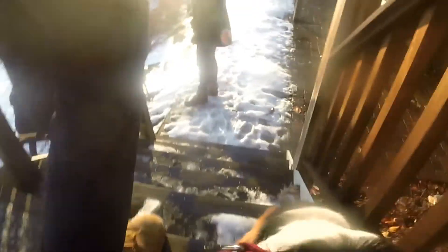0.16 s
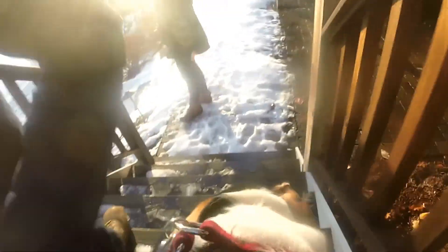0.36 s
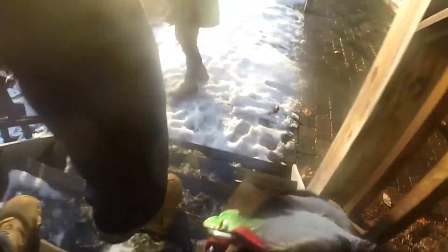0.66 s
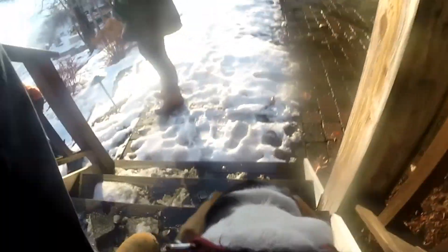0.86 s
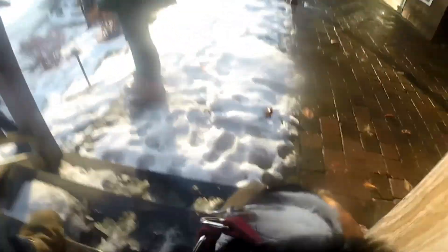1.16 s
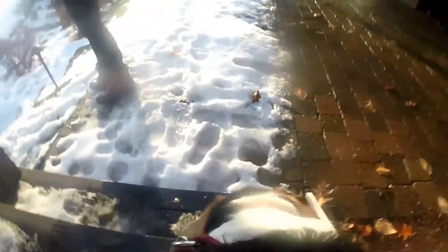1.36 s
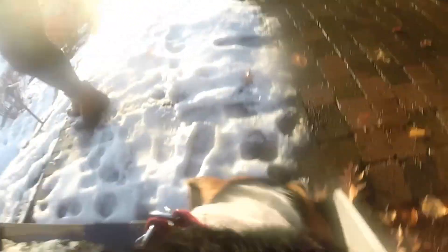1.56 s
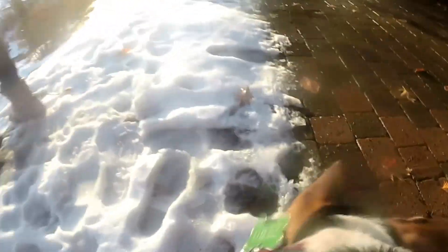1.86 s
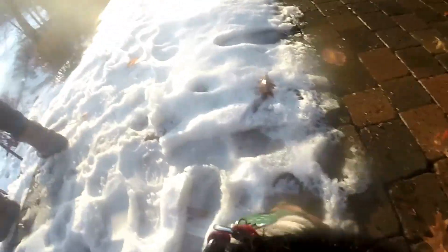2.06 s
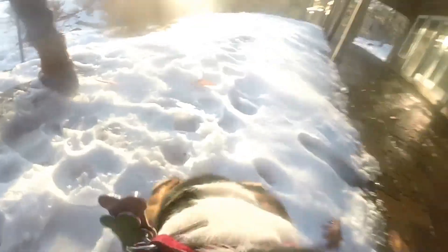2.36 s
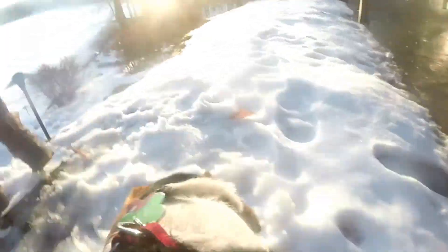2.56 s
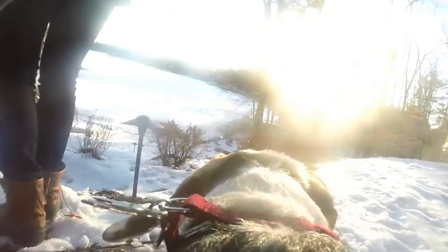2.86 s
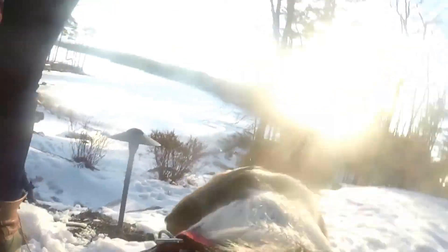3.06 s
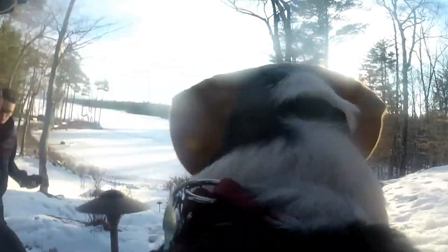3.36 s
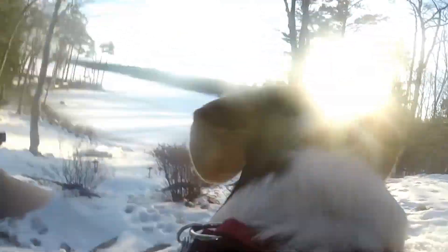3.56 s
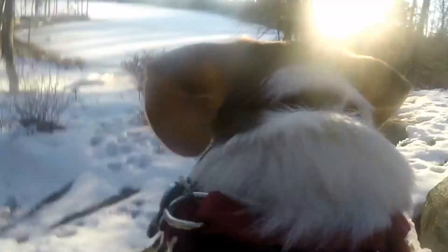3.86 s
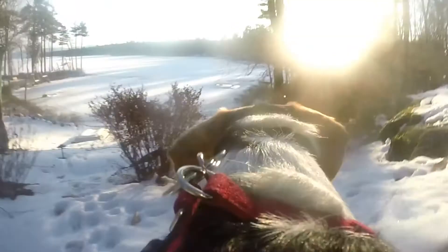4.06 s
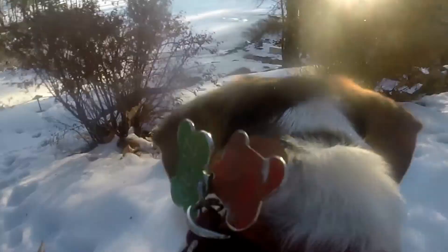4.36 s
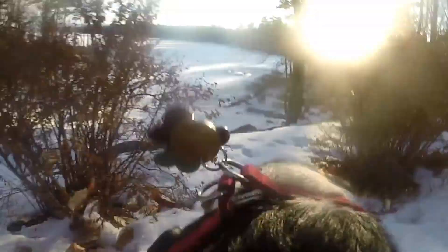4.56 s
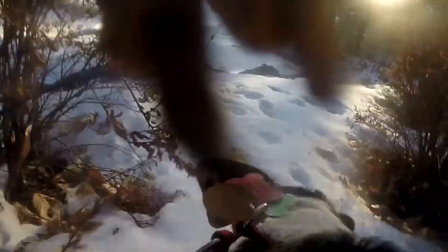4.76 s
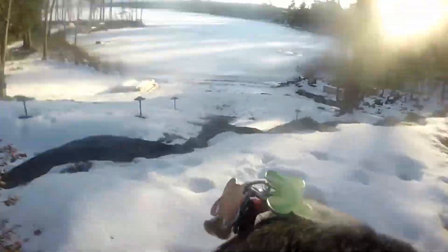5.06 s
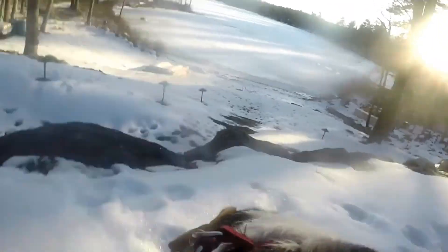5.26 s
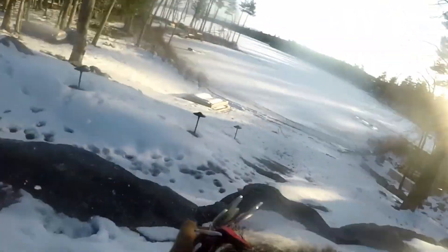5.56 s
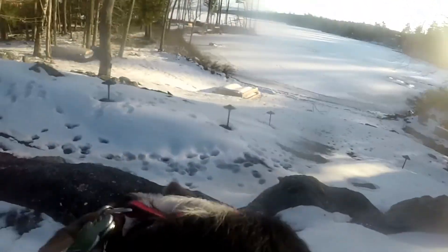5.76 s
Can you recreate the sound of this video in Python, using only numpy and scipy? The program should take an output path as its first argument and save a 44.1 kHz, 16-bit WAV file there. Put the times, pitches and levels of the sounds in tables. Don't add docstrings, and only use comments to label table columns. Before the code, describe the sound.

Very close, dry harness noise from a dog trotting down steps and across snow. Low wobbling thumps follow its strides, with tiny metal clinks and soft fabric rubbing throughout. Light plastic ticks lead to a loud scraping knock around three seconds; jangling grows strongest between 4.2 and 4.8, then a gritty, bright scrape cracks before the sound thins to light clinks.

```python
import sys
import numpy as np
from scipy import signal
from scipy.fft import rfft, irfft
from scipy.io import wavfile

SR = 44100
rng = np.random.default_rng(int(sys.argv[2]) if len(sys.argv) > 2 else 0)


def natural_amplitude(level_db):
    exponent = np.asarray(level_db, float) / 20
    return 10 ** exponent


def master(y):
    cut = np.clip(np.atleast_2d(y).T, -1, 1)
    pcm = np.round(cut * 32767)
    wavfile.write(sys.argv[1], SR, pcm.astype(np.int16))


N = 260190


def rms_one(x):
    return x / np.sqrt(np.mean(x ** 2) + 1e-20)


def noise():
    return rng.standard_normal(N)


def coloured(x, spectrum):
    hz, db = np.transpose(spectrum)
    bins_hz = np.fft.rfftfreq(N, 1 / SR) + 1
    gain_db = np.interp(np.log(bins_hz), np.log(hz), db, -120, -120)
    return rms_one(irfft(rfft(x) * natural_amplitude(gain_db), N))


def band(x, low_hz, high_hz):
    limits_hz = [low_hz, min(high_hz, .45 * SR)]
    return signal.sosfilt(signal.butter(2, limits_hz, "band", fs=SR, output="sos"), x)


def drift(rate):
    knots = rng.standard_normal(600)
    return np.interp(np.arange(N) / SR * rate, np.arange(600), knots)


def ring(clicks, hz, t60):
    r, w = natural_amplitude(-60 / (t60 * SR)), 2 * np.pi * hz / SR
    return signal.lfilter([0, np.sin(w)], [1, -2 * r * np.cos(w), r * r], clicks + 1e-18)


def fade(clicks, t60):
    return signal.lfilter([1], [1, -natural_amplitude(-60 / (t60 * SR))], clicks)


def train(s, size):
    return np.bincount(np.clip((s * SR).astype(int), 0, N - 1), size, N)


def grains(per_s, spread_db):
    sizes = natural_amplitude(spread_db * np.minimum(rng.exponential(1, N), 4)) * rng.choice([-1, 1], N)
    return rms_one(sizes * (rng.random(N) < per_s / SR))


def sway():
    t, width_s = np.arange(N) / SR, 0.047
    return sum(natural_amplitude(-18 + 0.56 * peak_db) * np.exp(-((t - s) / width_s) ** 2) for s, peak_db, _, _ in JOLTS)


# time in seconds, rumble between jolts in dB, strap rustle in dB.
TROT = [(0.0, -28.5, -51.5), (1.0, -24.5, -50), (1.66, -35.5, -50.5), (1.81, -21.5, -45.5),
        (1.94, -29, -48), (2.05, -28, -51), (2.68, -26, -51.5), (3.2, -27, -49), (3.5, -22.5, -54),
        (3.83, -28.5, -49.5), (4.22, -19, -51), (4.67, -27, -47.5), (4.88, -27, -54), (5.08, -22.5, -59.5),
        (5.34, -18.5, -53), (5.9, -35.5, -54)]


def trot_levels():
    s, *columns = np.transpose(TROT)
    rumble_db, rustle_db = (np.interp(np.arange(N) / SR, s, c) for c in columns)
    rumble_db = 20 * np.log10(natural_amplitude(rumble_db) + sway())
    rustle_db = np.minimum(rustle_db + 0.14 * (rumble_db + 29.5), -42)
    return rumble_db, rustle_db


# frequency in Hz, strength in dB per Hz.
RUMBLE = [(8, -12.5), (17, 3.5), (30, 5.5), (41, 0.5), (89, -15), (129, -28.5), (160, -35), (260, -100)]


def rumble(rumble_db):
    return natural_amplitude(rumble_db + 0.5 + 4.8 * drift(12)) * coloured(noise(), RUMBLE)


# frequency in Hz, strength in dB per Hz.
THUD = [(47, -102), (80, -7.5), (219, -17.5), (622, -28.5), (709, -30), (883, -39.5), (1100, -36),
        (1430, -40), (2420, -120)]


def harness_thud():
    return coloured(noise(), THUD)


def harness_murmur(rumble_db):
    return natural_amplitude(0.42 * rumble_db - 35.5 + 3.8 * drift(25)) * harness_thud()


# frequency in Hz, strength in dB per Hz.
RUSTLE = [(410, -60), (700, -3), (930, -10), (1350, -6), (1700, 3), (2000, -4), (2600, -5), (4300, -17),
          (6150, -18), (7700, -28), (10000, -36), (15000, -50)]


def rustle(rustle_db):
    return natural_amplitude(rustle_db + 1.5 + 2.64 * drift(33)) * coloured(grains(6000, spread_db=0.5), RUSTLE)


# start in seconds, level in dB, small tags over big ring in dB, rattle length in seconds.
CLASHES = [(0.48, -41, 2.5, 0.06), (0.534, -39, 6, 0.037), (0.561, -37.5, -5.5, 0.0084),
           (1.068, -42.5, 0, 0.024), (1.1103, -38.5, -2.5, .011), (1.6451, -37.5, 3, 0.03),
           (1.9908, -36, -13, 0.014), (2.0082, -38.5, -1.5, 0.024), (2.373, -39, -3, 0.1),
           (2.4366, -32.5, -4, 0.0053), (2.4912, -36, 2, 0.0075), (2.5407, -37.5, -6.5, .016),
           (3.0763, -40.5, -6, 0.013), (3.102, -44.5, -1, .02), (3.3144, -41.5, -7, .015),
           (3.3446, -36.5, 6, 0.0085), (3.473, -33.5, 2, 0.037), (3.9625, -41, 4, 0.012),
           (3.9777, -35.5, 15, 0.013), (4.1994, -37, 7, .017), (4.2779, -33, -3, 0.021),
           (4.298, -22.5, -1, 0.041), (4.5115, -26.5, -10, .014), (4.6599, -30, 7, 0.0097),
           (4.68, -27.5, 2, 0.033), (4.7092, -33, 1, 0.028), (4.7922, -19.5, 13, 0.02),
           (5.071, -40.5, -2.5, .028), (5.2673, -40.5, 2, 0.027), (5.3466, -31, -2.5, 0.029)]
# start in seconds, level in dB.
TAG_TOUCHES = [(0.2396, -43), (0.2922, -54), (0.416, -40), (0.856, -43), (0.996, -53), (1.164, -53),
               (1.4046, -48), (1.5789, -51.5), (1.7259, -50), (1.9151, -44.5), (2.2345, -42),
               (2.6426, -43.5), (3.0596, -43), (3.2883, -37.5), (3.6149, -42.5), (3.867, -43),
               (4.0087, -43), (4.0515, -48), (4.3692, -42), (4.5296, -48), (4.974, -36), (5.555, -47.5),
               (5.599, -38.5), (5.7666, -49.5)]
# start in seconds, level in dB.
RING_TOUCHES = [(0.6408, -49.5), (0.9083, -55.5), (1.2108, -46), (1.2715, -52), (1.3666, -47),
                (1.6773, -41), (1.9643, -46), (2.1591, -47.5), (2.2827, -56), (3.397, -51), (3.848, -47.5),
                (4.4281, -49), (4.4863, -42), (5.017, -38.5), (5.112, -48), (5.1354, -46.5), (5.194, -48),
                (5.331, -42), (5.4575, -57), (5.4879, -50.5), (5.7299, -53), (5.861, -46)]


def strikes():
    touch_s, bounce_within_s, bounce_loss_db = 0.02, .1, 13.0
    hits = list(CLASHES)
    for rows, tilt_db in ((TAG_TOUCHES, 2.5), (RING_TOUCHES, -8)):
        hits += [(s, db, tilt_db, touch_s) for s, db in rows]
    bounces = []
    for (s, db, tilt_db, length), pair in zip(hits, rng.random((len(hits), 2, 3))):
        for wait, weak, turn in pair:
            bounce_db = min(db, -36) - bounce_loss_db * (.5 + weak)
            bounces.append((s + length + bounce_within_s * wait, bounce_db, tilt_db + 16 * (turn - .5), .005))
    return np.transpose(hits + bounces)


# frequency in Hz, level in dB, seconds to fall 60 dB.
BIG_RING = [(3500, -23, .07), (4040, -12, .04), (4640, -8, .025), (4770, -6, .042), (6030, -3, .04),
            (6180, -5, .02), (6700, -9, .018)]
# frequency in Hz, level in dB, seconds to fall 60 dB.
NAME_TAG = [(7300, -13, .018), (8220, -5, .03), (9360, -4, .03), (9680, -5, .03), (10780, -4, .045)]
# frequency in Hz, level in dB, seconds to fall 60 dB.
SMALL_LINK = [(12700, -7, .03), (13540, -8, .03), (14420, -12, .025), (14920, -14, .025)]


def tags():
    s, level_db, tilt_db, length = strikes()
    place = np.sort(rng.random((len(s), 14)), axis=1)
    place -= place[:, :1]
    times = (s[:, None] + place * .8 * np.clip(length, .002, .08)[:, None]).ravel()
    force_db = level_db[:, None] - 2 - 9 * np.abs(place - .2) + 4 * rng.normal(0, 1, place.shape)
    tag_db = -10 * np.log10(2.0 + 10 ** (-tilt_db / 10))
    ring_db = tag_db - tilt_db
    out = np.zeros(N)
    for part, rel_db, gain_db in ((BIG_RING, ring_db, -1.5), (NAME_TAG, tag_db, -2.5), (SMALL_LINK, tag_db, -2.4)):
        swing = fade(train(s, natural_amplitude(0.73 * level_db + rel_db - 11.5)), t60=.2) + natural_amplitude(-62)
        for hz, db, t60 in part:
            share_db = 3 - 16 * rng.random((len(s), 1)) ** 2 + 1 + 4 * rng.normal(0, 1, place.shape)
            size = natural_amplitude(force_db + rel_db[:, None] + share_db + gain_db) * rng.choice([-1, 1], place.shape)
            shiver = swing * natural_amplitude(-41 + 8 * drift(30)) * grains(1800, spread_db=3)
            note = ring(train(times, size.ravel()) + shiver, hz, t60)
            out += natural_amplitude(db) * band(note, .85 * hz, 1.15 * hz)
    return out + contact_crackle(times, force_db, ring_db, tag_db)


def contact_crackle(times, force_db, ring_db, tag_db):
    overtones_hz = 3500 * 4.2 ** ((np.arange(15) + rng.random(15)) / 15)
    crackle = sum(natural_amplitude(6 * drift(45)) * ring(grains(1500, spread_db=4.0), hz, .01) for hz in overtones_hz)
    out = np.zeros(N)
    for rel_db, low_hz, high_hz in ((ring_db, 3600, 7300), (tag_db, 7300, 15000)):
        contact_db = (force_db + rel_db[:, None]).ravel()
        puff = fade(train(times, natural_amplitude(contact_db - 30.5)), t60=0.0055)
        chatter = fade(train(times, natural_amplitude(contact_db - 22)), t60=.1) * natural_amplitude(2.9 * drift(60))
        out += (puff + chatter) * rms_one(band(crackle, low_hz, high_hz))
    return out


# time in seconds, peak in dB, direction (1 or -1), swing frequency in Hz.
JOLTS = [(0.248, -10, 1, 32), (0.559, -18, 1, 29.8), (0.811, -7.5, -1, 28.8), (1.099, -8, 1, 26.7),
         (1.31, -11.5, 1, 21.8), (1.378, -4.5, -1, 29.2), (1.587, -13.5, -1, 60), (1.702, -12, -1, 24.2),
         (1.935, -13, 1, 28.4), (1.988, -14, 1, 51.3), (2.335, -9.5, -1, 26.3), (2.402, -9.5, -1, 34.5),
         (2.692, -22, 1, 34.8), (2.8, -18.5, 1, 38), (2.927, -4.5, 1, 55.7), (3.414, -1.5, -1, 26),
         (3.59, -13.5, -1, 28), (3.809, -17.5, 1, 37.3), (4, -5, -1, 28), (4.045, -8.5, -1, 25),
         (4.17, -17, 1, 28), (4.204, -7, -1, 37), (4.258, -6.5, 1, 28.2), (4.478, -2, 1, 51.6),
         (4.524, -12, 1, 29.2), (4.666, -5.5, -1, 57.4), (4.78, 3, 1, 41.2), (4.833, -10.5, 1, 42.6),
         (5.288, -7.5, -1, 45.7), (5.503, -9.5, 1, 31)]


def jolts():
    out, shake, t = np.zeros(N), np.zeros(N), np.arange(-3000, 3000) / SR
    for s, peak_db, direction, hz in JOLTS:
        at = slice(int(s * SR) - 3000, int(s * SR) + 3000)
        swing = np.cos(2 * np.pi * hz * t) * np.exp(-(2.48 * hz * t) ** 2)
        out[at] += natural_amplitude(peak_db + 1.5) * np.sign(direction) * swing
        thud_db = -41 + 0.78 * peak_db + 0.18 * hz + 8.0
        shake[at] += natural_amplitude(thud_db) * np.exp(-(t / 0.016) ** 2)
    return out + shake * harness_thud()


# start in seconds, peak in dB.
THUMPS = [
    (0.434, -15),
    (1.577, -17.5),
]


def thumps():
    out, t = np.zeros(N), np.arange(int(.07 * SR)) / SR
    cycles = 95 * t + 220 * 0.0086 * (1 - np.exp(-t / 0.0067))
    tone = np.sin(2 * np.pi * cycles) * (1 - np.exp(-t / 0.017)) * np.exp(-t / 0.013)
    for s, peak_db in THUMPS:
        out[int(s * SR):int(s * SR) + len(t)] += natural_amplitude(peak_db + 7) * tone
    return out


# frequency in Hz, level in dB, seconds to fall 60 dB.
HOUSING = [(1240, -3.5, 0.0083), (1623, 0, 0.019), (2274, 4, 0.0088), (2560, 4.5, 0.0086),
           (2621, -4, 0.023), (3590, -22.5, 0.004)]


def housing(clicks):
    return sum(natural_amplitude(db) * ring(clicks, hz, t60) * (-1) ** k for k, (hz, db, t60) in enumerate(HOUSING))


# hardest rub in seconds, build-up in seconds, let-go in seconds, body in dB, hiss in dB.
SCRAPES = [(0.535, 0.042, 0.032, -40, -59), (1.281, 0.15, 0.093, -38, -49.5), (4.21, .08, 0.12, -43.5, -42),
           (1.088, 0.044, 0.033, -33, -39.5), (1.663, 0.05, 0.033, -28.5, -41),
           (2.908, 0.021, 0.022, -15.5, -28), (2.926, 0.01, 0.033, -7.5, -17.5),
           (2.967, 0.01, 0.055, -29, -30), (2.987, 0.021, 0.011, -14, -26.5),
           (4.904, 0.018, 0.016, -23.5, -35), (4.924, 0.0037, 0.031, -15, -10),
           (4.95, 0.02, 0.0076, -18, -11), (5.035, 0.0081, 0.064, -31.5, -44)]
# frequency in Hz, strength in dB per Hz.
HISS = [(1760, 16), (3000, -14.5), (3950, -17), (5920, -3.5), (8180, -6.5), (9260, -7.5), (12600, -18.5),
        (15500, -17)]


def scrapes():
    slips = grains(2000, spread_db=4.5)
    shell, upper = rms_one(housing(slips)), rms_one(band(slips, 2110, 3300))
    hiss = coloured(grains(12000, spread_db=4.0), HISS)
    thud = rms_one(band(noise(), 60, 190) + natural_amplitude(-10.5) * band(noise(), 280, 1100))
    out, t = np.zeros(N), np.arange(N) / SR
    for s, rise, fall, body_db, hiss_db in SCRAPES:
        away = np.maximum((s - t) / rise, (t - s) / fall)
        rub = natural_amplitude(-20 * np.minimum(away, 10))
        grit_db = hiss_db - body_db
        body = natural_amplitude(-2 - 0.37 * max(grit_db + 10.5, 0)) * shell + natural_amplitude(-4.5) * upper
        thud_db = body_db - 19 - grit_db
        out += rub * (natural_amplitude(body_db) * body + natural_amplitude(hiss_db) * hiss + natural_amplitude(thud_db) * thud)
    return out


# start in seconds, peak in dB, treble against the peak in dB.
TICKS = [(0.64, -24, 1), (0.7243, -25, -40), (0.7545, -16.5, -31), (0.9058, -22.5, -34), (1.0783, -26, -23),
         (1.3632, -11.5, -15.5), (1.4676, -24.5, -11.5), (1.649, -18.5, -30), (1.8222, -32, 5),
         (1.936, -12, -40.5), (2.2273, -22, -7.5), (2.2787, -27, -3), (2.309, -25, -3.5), (2.8811, -10, -9),
         (2.9056, -15, -21), (2.9229, 0, -23.5), (2.9668, -7.5, -21.5), (2.985, -6, -35),
         (3.0092, -14, -0.5), (3.4056, -28, -21), (3.46, -30.5, -24), (3.9115, -73, -13),
         (4.8911, -24, 15.5), (4.8976, -13, 2), (4.922, -2.5, 4.5), (5.026, -32, -15.5), (5.0511, -23, -17),
         (5.0728, -23, -19.5), (5.1159, -28, -7), (5.2781, -52, 31.5)]
# start in seconds, peak in dB, treble against it in dB.
SLIPS = [
    (4.9265, -9, -19),
    (4.9300, -8, 18),
    (4.9478, -34, -25),
]


def ticks():
    s, peak_db, treble_db = np.transpose(list(TICKS) + list(SLIPS))
    crack = fade(train(s, natural_amplitude(peak_db + treble_db - 9.0)), t60=0.01) * rms_one(band(noise(), 3600, 7200))
    glancing_db = 0.25 * np.maximum(treble_db + 12, 0)
    knock = train(s, natural_amplitude(peak_db - 5.5 - glancing_db))
    return housing(knock) + 4.1 * band(band(knock, 490, 4300), 300, 7500) + crack


def scene():
    rumble_db, rustle_db = trot_levels()
    ride = rumble(rumble_db) + harness_murmur(rumble_db) + rustle(rustle_db)
    return (ride + tags() + jolts() + thumps() + scrapes() + ticks())[None]


def top_cut(x):
    return signal.sosfilt(signal.butter(12, 16340, fs=SR, output="sos"), x)


def record(dry):
    rounded = np.tanh(dry * 0.79)
    treble_cut = signal.butter(14, 15050, fs=SR, output="sos")
    mix = np.clip(signal.sosfilt(treble_cut, rounded), -.93, .93)
    return top_cut(mix)


dry = scene()
out = record(dry)
master(out)
```